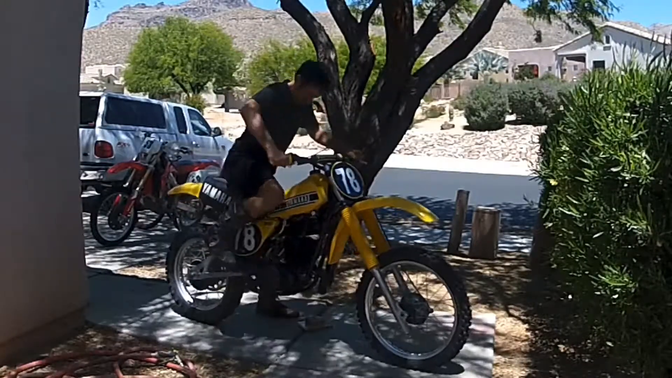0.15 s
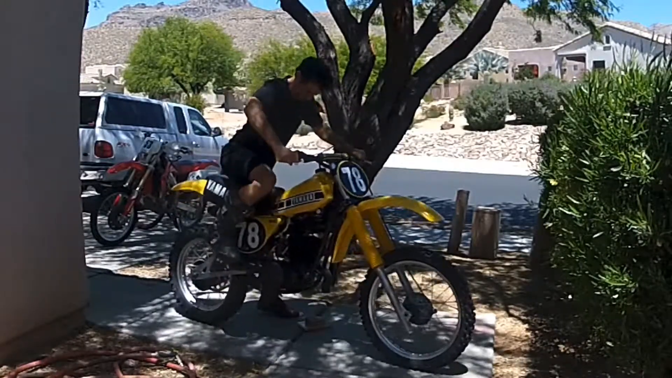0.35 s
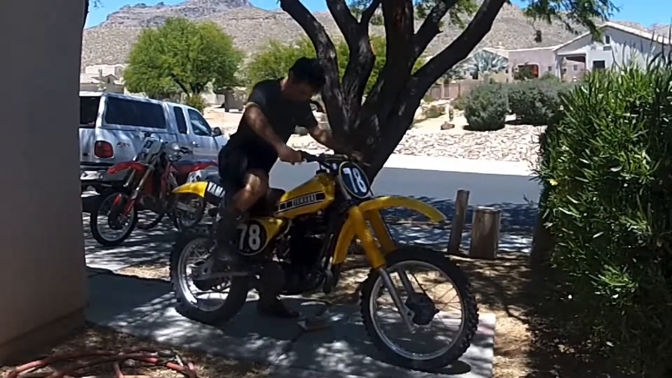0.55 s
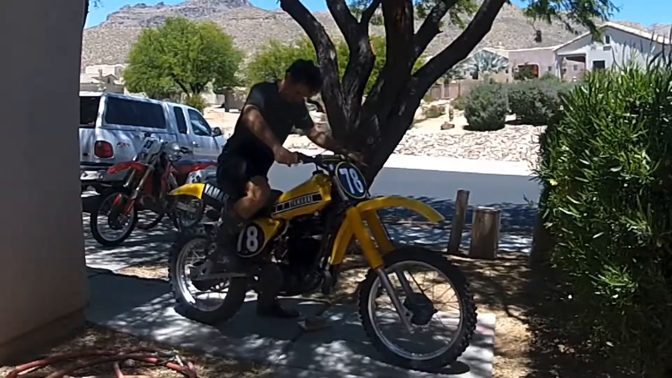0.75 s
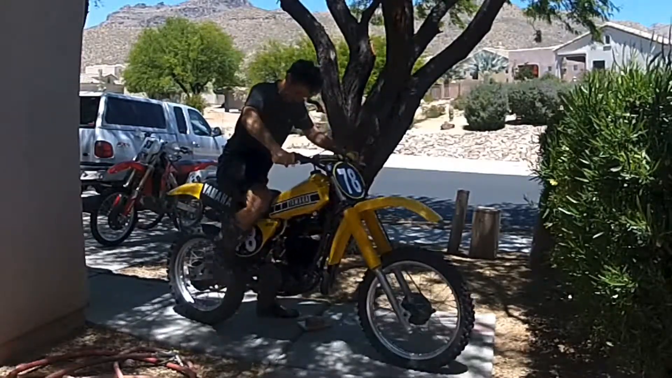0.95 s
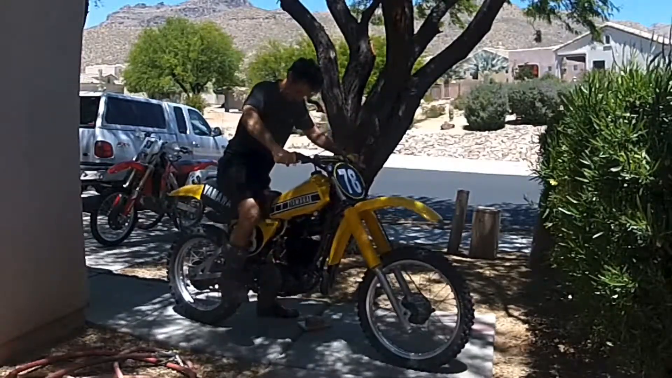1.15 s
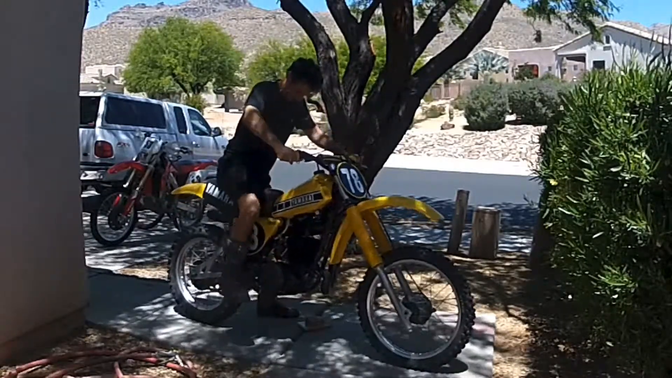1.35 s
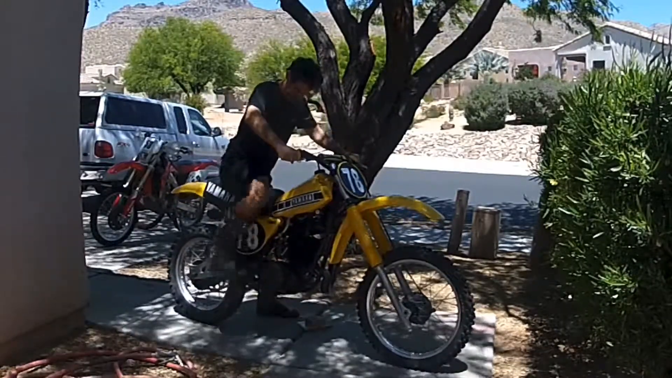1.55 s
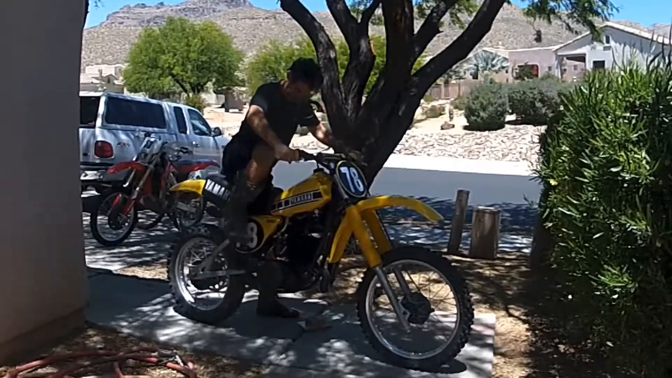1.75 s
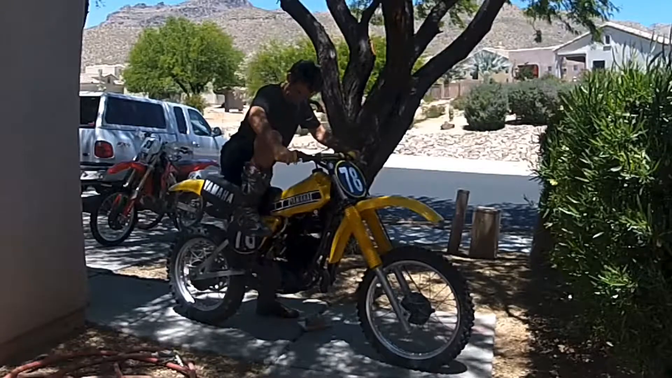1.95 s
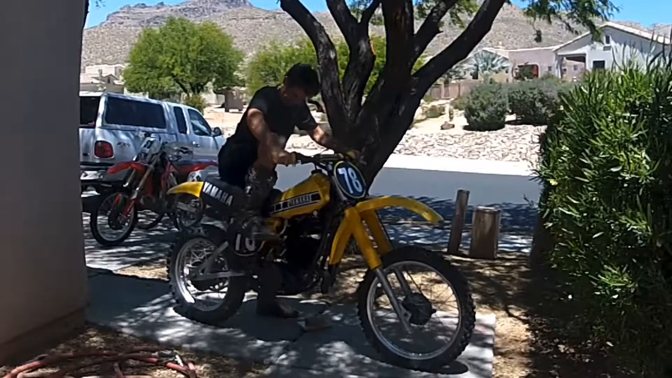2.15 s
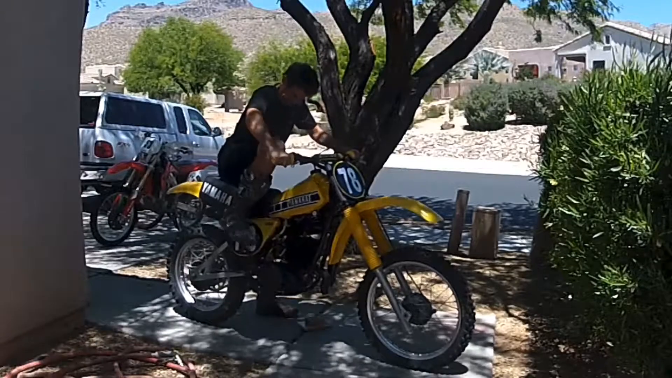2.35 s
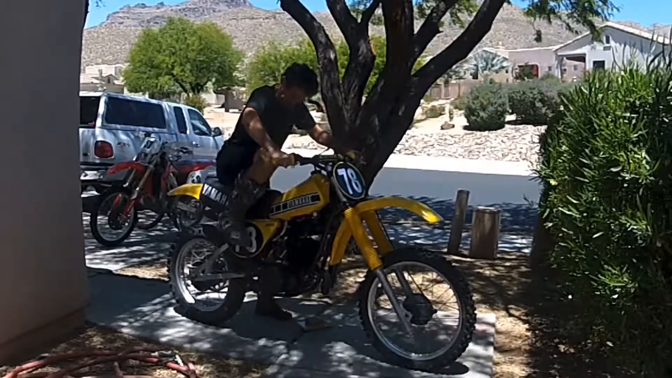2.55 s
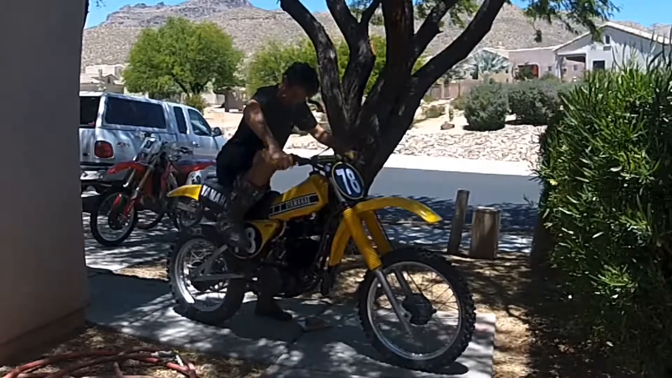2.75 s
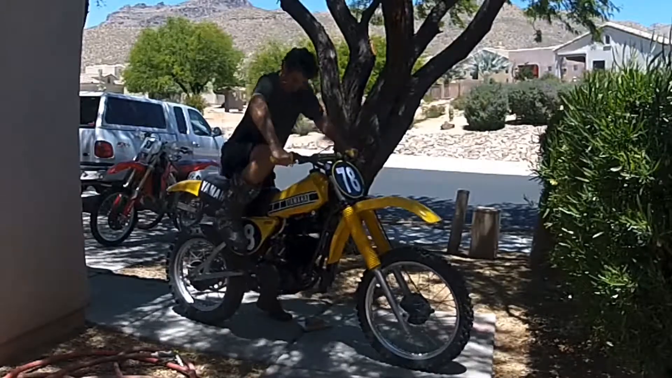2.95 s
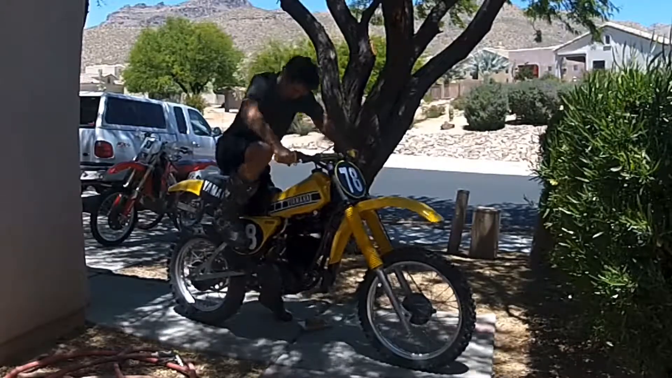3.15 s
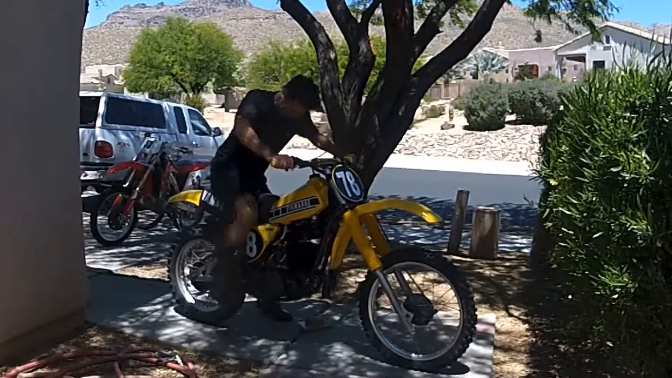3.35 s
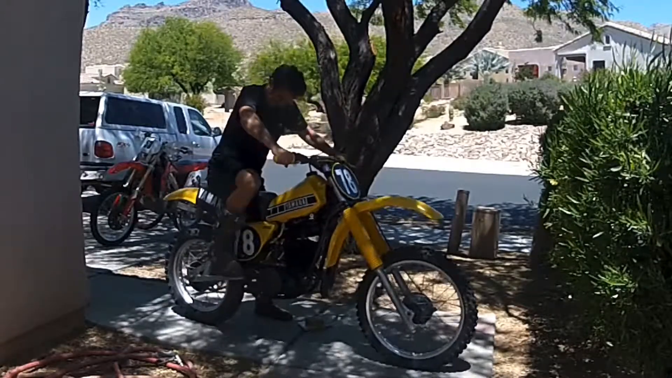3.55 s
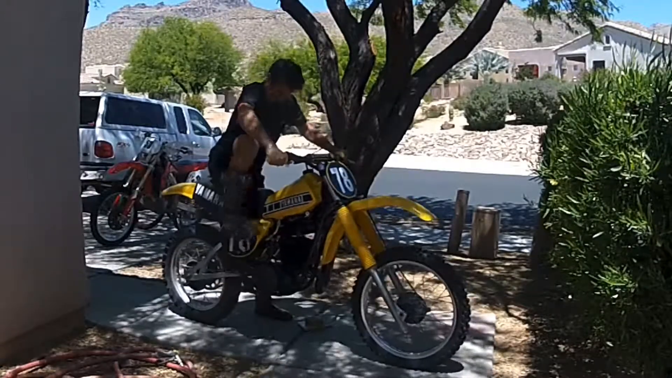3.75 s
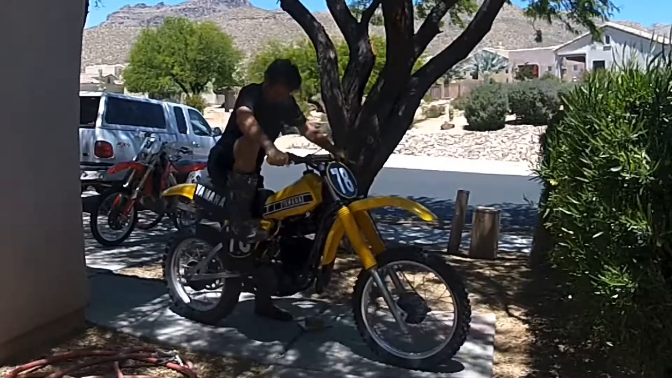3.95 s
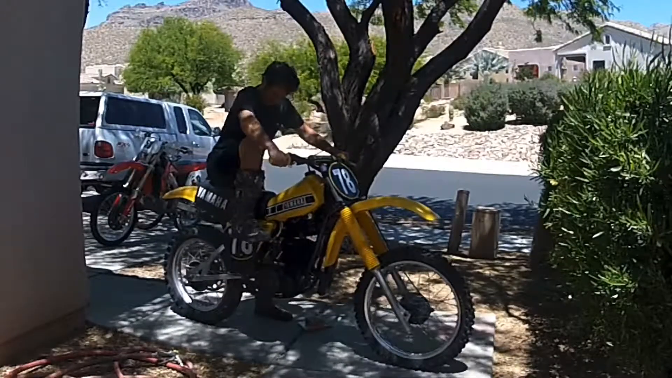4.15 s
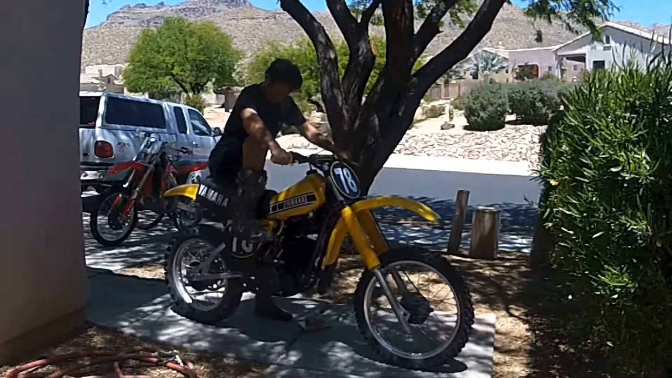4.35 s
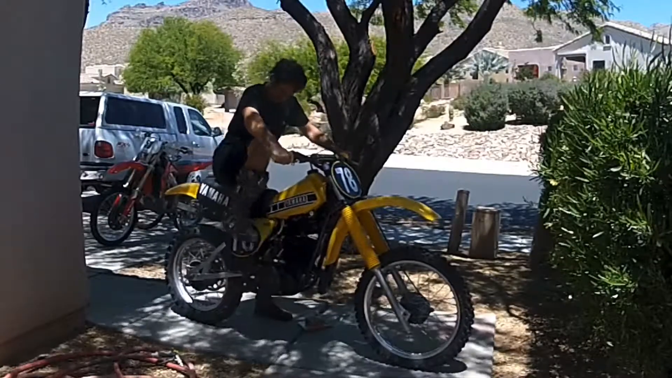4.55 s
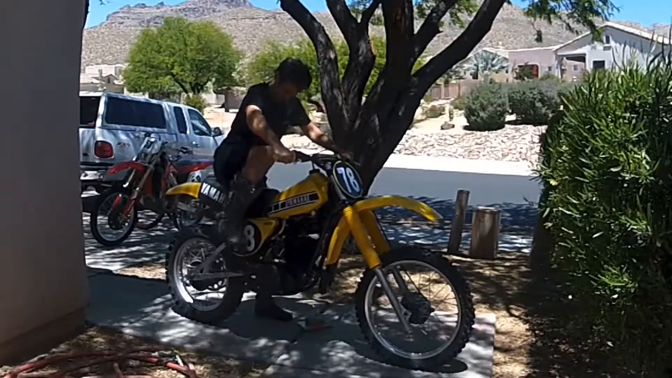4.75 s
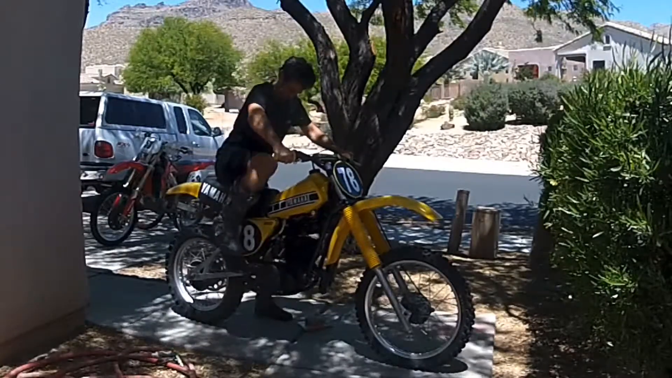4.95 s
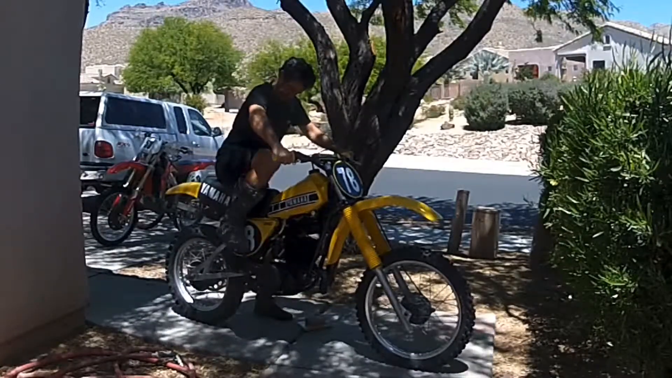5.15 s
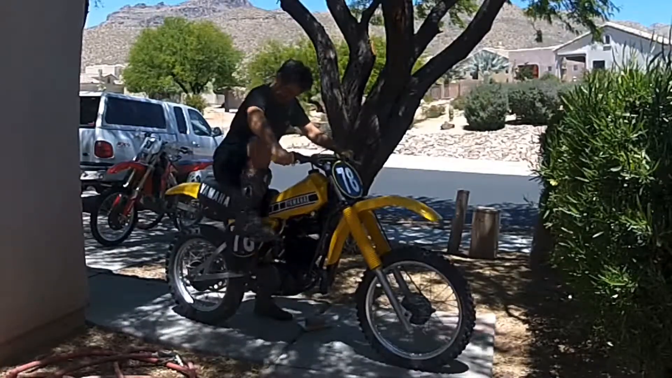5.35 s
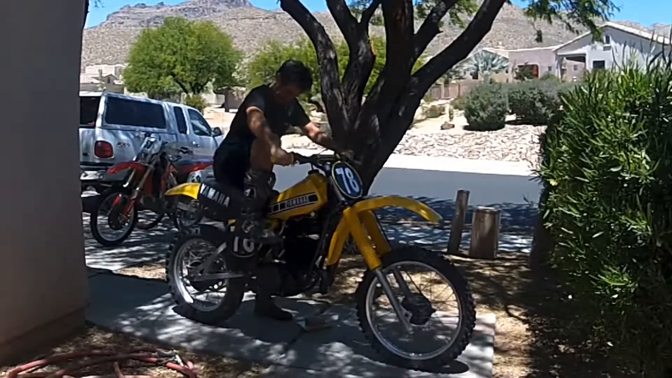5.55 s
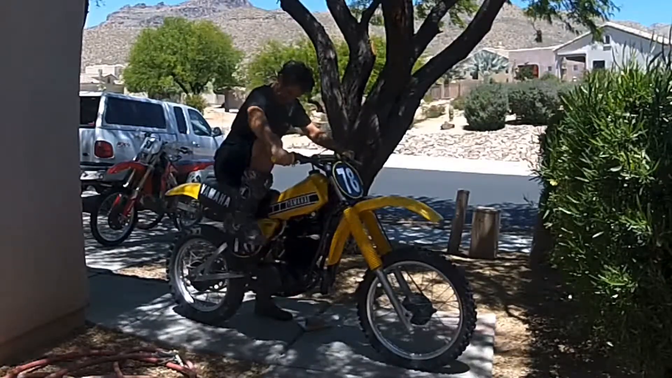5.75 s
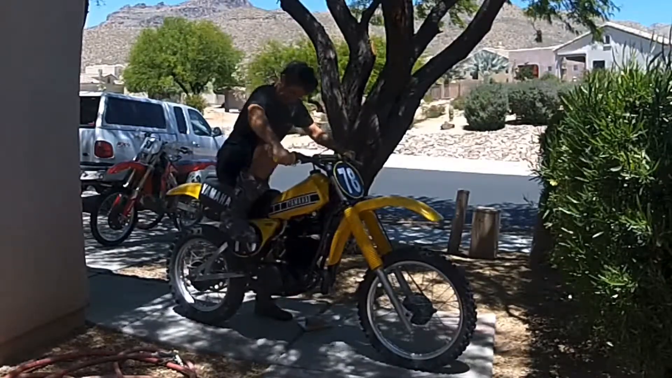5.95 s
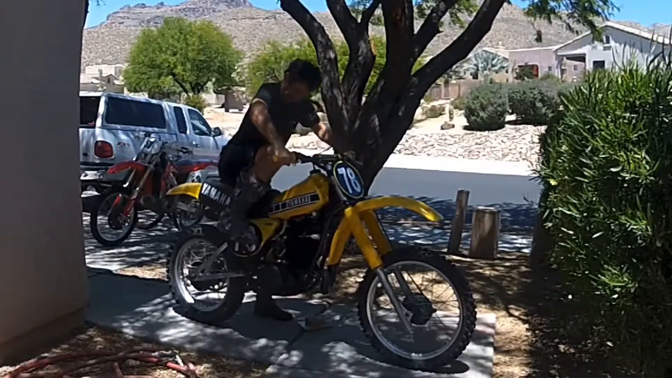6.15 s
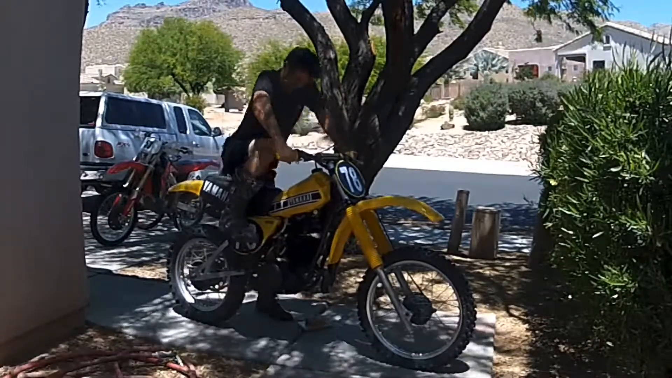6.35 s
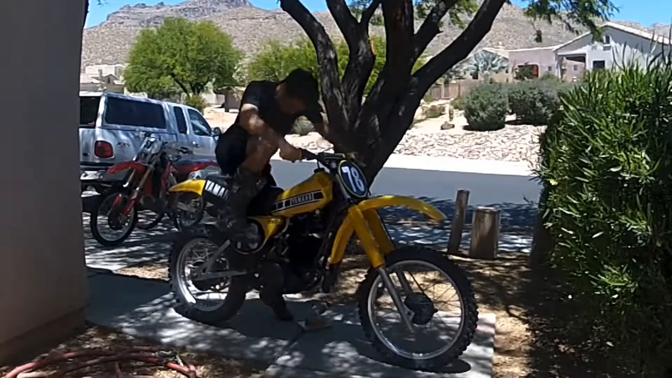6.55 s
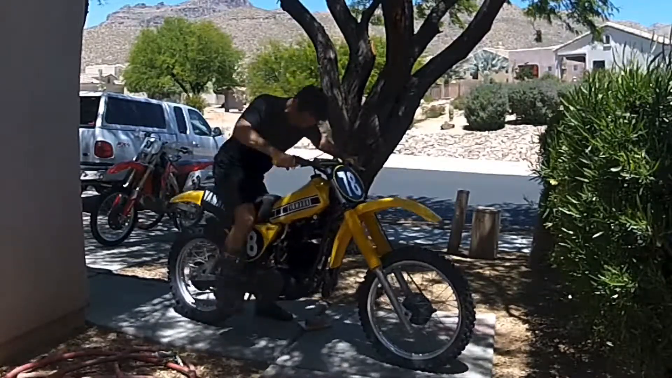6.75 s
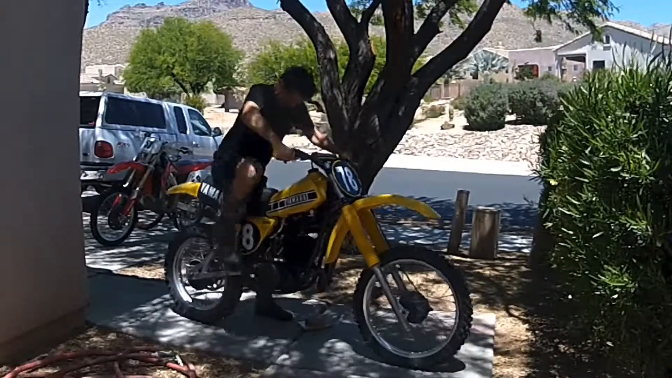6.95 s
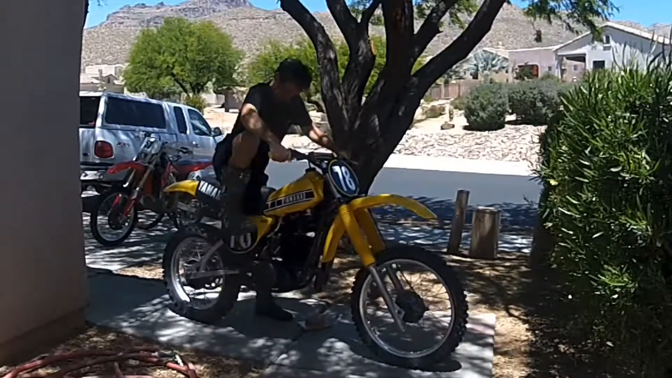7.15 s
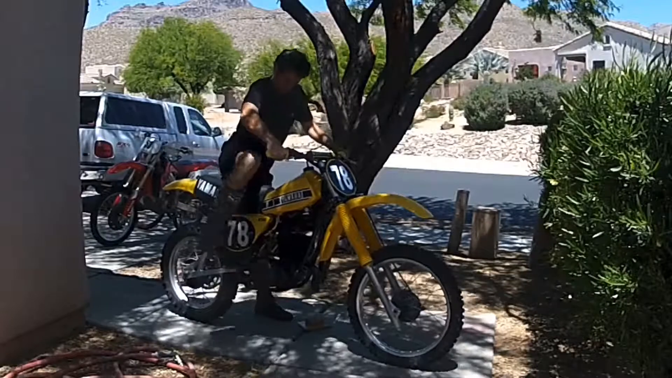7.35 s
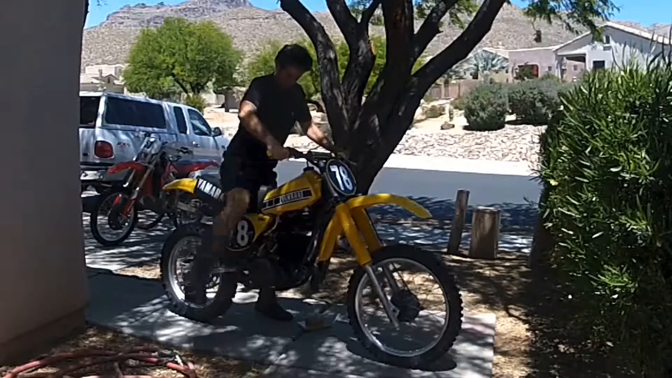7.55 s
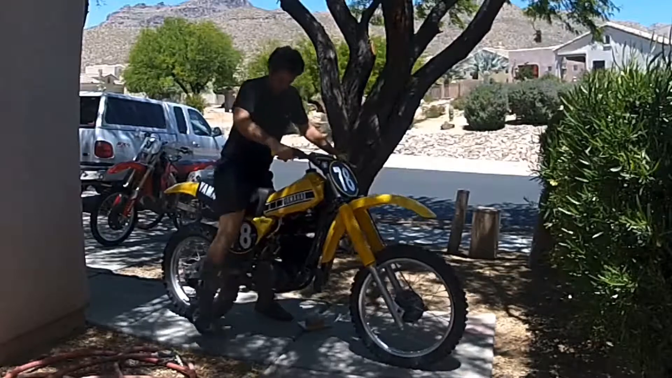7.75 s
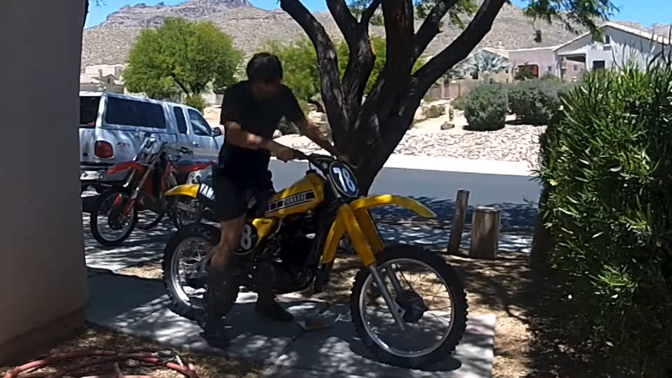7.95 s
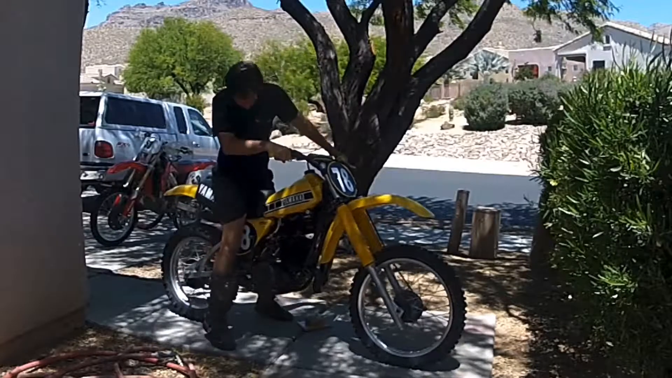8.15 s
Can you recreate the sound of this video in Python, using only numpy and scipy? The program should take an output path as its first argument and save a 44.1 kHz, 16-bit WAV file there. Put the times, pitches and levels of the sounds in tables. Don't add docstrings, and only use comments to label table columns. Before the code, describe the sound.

Soft boot scuffs and one sharp lever clank lead into loose ratchet clicks, then a loud kick turns a two-stroke engine through a few chuffing puffs. After a sparse pause with small clicks, a second, slightly harder kick does the same, ending in pawl ticks. Close, dry microphone with rough treble, short wall echo, far traffic drone and very faint bird whistles.

```python
import sys
import numpy as np
from scipy import signal
from scipy.fft import rfft, irfft
from scipy.io import wavfile
from scipy.ndimage import uniform_filter1d

SR = 44100
rng = np.random.default_rng(int(sys.argv[2]) if len(sys.argv) > 2 else 0)


def undo_db(level):
    steps = np.asarray(level, float) / 20
    return 10 ** steps


def unload_wav(signal):
    wavfile.write(
        sys.argv[1],
        SR,
        np.round(np.clip(np.atleast_2d(signal).T, -1, 1) * 32767).astype(np.int16),
    )


N = 362295

# (frequency [Hz], level [dB per Hz])
CRACK_SPECTRUM = [(500, -46), (900, -8), (1200, -3.5), (1500, -5.5), (1800, -2.5), (2800, 1.5),
                  (3900, -4.5), (4600, -11), (5200, -15.5), (5900, -19), (7500, -65)]
# (frequency [Hz], level
# [dB], t60 [s])
PAWL_MODES = [(1289, -2, .25), (1825, 3, .33), (2670, -3, .2), (2900, 3, .22), (3130, -1, .16)]
# (starter gears at full spin [s], gears [dB], rider drops on the lever [s], fork thump [dB])
KICKS = [
    (3.472, -46.5, 3.27, -51),
    (6.846, -46.5, 6.61, -41),
]


def unit(x):
    return x / np.sqrt(np.mean(x ** 2))


def colour(x, points):
    hz, db = np.transpose(points)
    f = np.arange(len(x) // 2 + 1) * SR / len(x) + 1
    gain = undo_db(np.interp(np.log(f), np.log(hz), db))
    return irfft(rfft(x) * gain, len(x))


def bank(modes, size):
    hz, db, t60 = np.array(modes, float).T[:, :, None]
    t = np.arange(size) / SR
    decay = np.exp(-np.log(1000) * t / t60)
    return undo_db(db) * np.sin(2 * np.pi * hz * t) * decay, hz[:, 0]


def add(out, s, x):
    i = max(int(s * SR), 0)
    out[i:i + len(x)] += x[:len(out) - i]


def walk(rate):
    k = int(SR / rate)
    held = np.repeat(rng.standard_normal(N // k + 1), k)
    return unit(uniform_filter1d(uniform_filter1d(held, k), k)[:N])


def blows(table, ringer, focus_db, crack_db=0.5, crack_s=0.012, frame_db=-17.0):
    # (frequency [Hz], level [dB], t60 [s])
    steel_modes = [(1740, -8, .07), (1825, -6, .1), (1900, -6, .07), (2150, -9, .08), (2430, -8, .08),
                   (2540, -7, .08), (2670, -7, .1), (2820, -6, .1), (2960, -8, .08), (3060, -6, .09),
                   (3150, -6, .09), (3330, -7, .08), (3450, -8, .07), (3690, -7, .07), (3860, -8, .06),
                   (4030, -9, .06), (4250, -13, .05), (4770, -15, .05), (5050, -19, .04)]
    # (frequency [Hz], level [dB], t60 [s])
    hollow_modes = [(405, -1, 0.059), (494, -1, 0.064), (658, 12.5, 0.033), (781, -1.5, 0.085),
                    (1018, -5.5, 0.073)]
    scatter_db, grain_db, rattle_db = 4.0, 3.0, 6.0
    onset = 0.37
    out, size, spurts = np.zeros(N), SR, walk(150)
    steel, hz = bank(steel_modes, size)
    hollow, _ = bank(hollow_modes, size)
    ring, ring_hz = bank(ringer, size)
    t, long = np.arange(4096) / SR, np.arange(size) / SR
    for s, db, thud_db, best_hz, ring_db, ms in table:
        place = rng.standard_normal(32)
        contact = rng.standard_normal((2, 4096))
        hiss = rng.standard_normal(size)
        tau = max(ms, 1) / 2000
        chatter = contact[0] * undo_db(grain_db * contact[1]) * (t / tau) ** onset * np.exp(-t / tau)
        chatter /= np.sqrt(np.sum(chatter ** 2))
        focus = undo_db(-focus_db * np.abs(np.log2(hz / best_hz)))
        body = (undo_db(scatter_db * place[:len(hz)]) * focus) @ steel / 2
        body += undo_db(thud_db) * undo_db(scatter_db * place[-len(hollow_modes):]) @ hollow
        sound = signal.fftconvolve(body, chatter)[:size]
        slope_db = 2.0 * np.log2(best_hz / 2600)
        edge = [(f, d + slope_db * np.log2(f / 2800) - 4.0 * abs(np.log2(f / best_hz)))
                for f, d in CRACK_SPECTRUM]
        loose = rattle_db * spurts[int(s * SR) % (N - size):][:size]
        fade = undo_db(crack_db) * np.exp(-long / (tau + crack_s))
        fade = fade + undo_db(frame_db - 60 * long / 0.14 + loose)
        rise = 1 - np.exp(-long / tau)
        sound = sound * undo_db(0.61 * loose) + unit(colour(hiss, edge)) * rise ** (2 * onset) * fade
        sound *= 1.007 / np.abs(sound).max()
        ring_share = undo_db(ring_db - 11.5 * np.abs(np.log2(ring_hz / best_hz)))
        sound += ring_share @ ring * rise
        add(out, s - .001 - 0.597 * tau, undo_db(db) * sound)
    return out


def lever():
    # (time [s], peak level [dB], strongest frequency [Hz])
    clanks = [(0.0594, -59, 3000), (0.1686, -54, 2890), (0.2094, -55, 2240), (0.9731, -44.5, 2850),
              (0.9982, -35, 2640), (1.0141, -38, 1570), (1.0381, -47, 1630), (1.1615, -17.5, 2900),
              (2.406, -47, 2720), (2.61, -64, 1810), (3.304, -35, 2280), (3.349, -39, 2870),
              (3.398, -39, 2870), (3.433, -14, 3070), (3.5097, -28, 3020), (3.585, -21.5, 2330),
              (3.6111, -30, 2850), (4.556, -53.5, 2900), (4.612, -46, 1810), (5.4031, -36.5, 2850),
              (5.8265, -49.5, 2700), (6.6734, -37, 2370), (6.7126, -39, 1610), (6.73, -40.5, 1860),
              (6.751, -34.5, 1820), (6.802, -11.5, 2900), (6.8495, -25.5, 3200), (6.924, -38, 3060),
              (7.239, -38, 1780)]
    table = []
    for s, db, hz in clanks:
        over_db = db - -36
        thud_db = -2 - 0.69 * max(over_db, 0)
        rattle_ms = 8 - 0.07 * over_db
        table.append((s, db, thud_db, hz, -37.5, rattle_ms))
    return blows(table, PAWL_MODES, focus_db=13.0)


def ratchet():
    # (time [s], peak level [dB], strongest frequency [Hz], rattle
    # [ms])
    ticks = [(1.511, -36, 2940, 11.8), (1.6086, -35, 3270, 5.5), (1.7257, -34.5, 2800, 6.8),
             (1.8611, -39.5, 2670, 9.9), (1.958, -51, 1790, 4.1), (2.2603, -52.5, 2880, 8.9),
             (2.414, -48.5, 1150, 12), (2.53, -54.5, 2600, 45), (3.7055, -33, 2850, 5.3),
             (3.792, -34.5, 2000, 4.8), (3.839, -37, 2040, 9.3), (4.296, -52.5, 1810, 5),
             (5.3262, -34.5, 2960, 8.8), (5.7485, -53.5, 2940, 8), (5.836, -50.5, 1260, 12),
             (7.0218, -30.5, 3120, 3.98), (7.0812, -36.5, 2030, 3.83), (7.1663, -32, 1920, 6.5),
             (7.219, -37, 1800, 4.2)]
    thud_db, ring_db = -20, -16
    table = [(s, db, thud_db, hz, ring_db, ms) for s, db, hz, ms in ticks]
    return blows(table, PAWL_MODES, focus_db=38.0, crack_db=-7.0, crack_s=.004, frame_db=-16.0)


def spring():
    # (frequency [Hz], level [dB], t60 [s])
    spring_mode = [(1289, -8, 2.8)]
    # (time [s], level [dB], damped by boot or ratchet at [s])
    plucks = [
        (1.162, -58, 1.5),
        (3.433, -57, 3.66),
        (5.326, -64, 5.75),
        (6.802, -51, 7.16),
    ]
    out, t = np.zeros(N), np.arange(SR) / SR
    tone = bank(spring_mode, SR)[0][0]
    for s, db, stop_s in plucks:
        damping = np.exp(-np.maximum(t + s - stop_s, 0) / 0.11)
        add(out, s, undo_db(db) * tone * damping)
    return out * undo_db(1.5 * walk(31))


def chamber(table, scatter_db=4.5, focus_db=11.0):
    # (frequency [Hz], level [dB], t60 [s])
    chamber_modes = [(86.6, -9.5, 0.07), (143, -24, .05), (189.8, -8, .13), (245, -5, 0.086),
                     (314, 1.5, 0.057), (382.5, -2.5, 0.091), (443, -3, 0.077), (549.6, -2, 0.052),
                     (664, -5, 0.053), (814, -57, 0.087)]
    out, t = np.zeros(N), np.arange(8192) / SR
    modes, hz = bank(chamber_modes, size=SR // 2)
    mouth = signal.butter(2, (70, 850), "band", fs=SR, output="sos")
    pop = t * np.exp(-t / 0.00075)
    for s, db, best_hz, ms, gas_db in table:
        place, gas = rng.standard_normal(len(hz)), rng.standard_normal(8192)
        flow = gas * np.exp(-t * 1000 / max(ms, 2))
        push = pop / pop.sum() + undo_db(gas_db) * flow / np.sqrt(np.sum(flow ** 2))
        share = undo_db(scatter_db * place - focus_db * np.abs(np.log2(hz / best_hz)))
        wave = signal.sosfilt(mouth, signal.fftconvolve(share @ modes, push))
        add(out, s - .003, undo_db(db - 4.0) * wave / np.abs(wave).max())
    return out


def engine():
    # (time [s], peak level [dB], strongest frequency of the wave back from the chamber's cone [Hz])
    turns = [
        (3.354, -18.5, 180),
        (3.462, -11, 380),
        (3.557, -23.5, 200),
        (3.652, -31.5, 210),
        (6.723, -15, 185),
        (6.821, -13.5, 330),
        (6.907, -16, 260),
        (6.985, -36, 205),
    ]
    # (delay [ms], level [dB], own strongest frequency [Hz], pull to returning pitch [0-1])
    gusts = [
        (0, -3, 50, 0.43),
        (9.95, 0.9, 158, 0.5),
        (34.04, -3, 300, .99),
        (57.02, -7, 148, 0),
    ]
    blow_down_ms, gas_db = 16.7, -4
    table = []
    for s, db, back_hz in turns:
        for ms, gust_db, hz, pull in gusts:
            pulled_hz = hz * (back_hz / hz) ** np.clip(pull, 0, 1)
            table.append((s + ms / 1000, db + gust_db, pulled_hz, blow_down_ms, gas_db))
    return chamber(table, scatter_db=2.0, focus_db=12.0)


def boot():
    # (time [s], peak level [dB], strongest
    # frequency [Hz], scrape level [dB])
    scuffs = [(0.018, -47, 194, 10), (0.729, -52, 167, 7), (1.006, -38, 673, 9), (1.046, -29.5, 155, -15),
              (1.062, -36, 175, 9), (1.09, -37, 151, 2), (1.16, -27.5, 680, 4), (1.198, -43, 223, 5),
              (2.407, -41.5, 167, -5), (3.435, -16.5, 400, -6.5), (3.584, -14.5, 660, -9.5),
              (4.618, -41, 194, -4), (5.399, -55, 213, -7), (5.826, -48, 151, 0), (6.652, -40, 235, 12),
              (6.681, -26.5, 231, -6), (6.75, -25.5, 680, 6.5), (6.804, -13, 686, -5.5),
              (7.223, -41, 151, -8), (7.235, -39, 705, 9)]
    scrape_ms = 20.6
    return chamber([(s, db, hz, scrape_ms, scrape_db) for s, db, hz, scrape_db in scuffs])


def gears():
    rise_db_s, coast_db_s, coast_s = 179, 117, 0.15
    meshing = rng.standard_normal(N) * undo_db(5.0 * rng.standard_normal(N) + 4.0 * walk(60))
    t, gain = np.arange(N) / SR, np.zeros(N)
    for s, db, _, _ in KICKS:
        drop_db = np.maximum(rise_db_s * (s - t), coast_db_s * (t - s))
        gain += undo_db(db - drop_db) * (t < s + coast_s)
    spectrum = [(f, d + 4.0 * abs(np.log2(f / 2800))) for f, d in CRACK_SPECTRUM]
    return gain * unit(colour(meshing, spectrum))


def thump():
    t = np.arange(N) / SR
    sway = np.sin(2 * np.pi * 50.5 * t)
    return sum(undo_db(db - 10 * ((t - s) / 0.084) ** 2) * sway for _, _, s, db in KICKS)


def birds():
    # (time [s], length [s], start [Hz], end [Hz], level [dB])
    whistles = [(1.038, .035, 4050, 4150, -63), (1.04, .03, 5100, 5150, -66),
                (2.975, .015, 5600, 5750, -66), (2.99, .008, 4300, 3500, -66),
                (3.003, .012, 4600, 4700, -67), (3.027, .022, 3950, 4050, -66),
                (3.044, .012, 4500, 4700, -66), (3.052, .008, 4000, 3400, -68),
                (3.063, .01, 5300, 5350, -69), (3.082, .022, 3500, 3400, -68),
                (3.09, .025, 4150, 4050, -72), (6.0, .05, 4600, 4400, -72), (6.23, .04, 2950, 2850, -72),
                (6.288, .016, 4100, 3950, -68), (6.525, .025, 4500, 4300, -71),
                (6.535, .11, 4080, 3960, -67)]
    out = np.zeros(N)
    for s, length, from_hz, to_hz, db in whistles:
        n = int(length * SR)
        hz = np.linspace(from_hz, to_hz, n) * (1 + 0.025 * walk(173)[:n])
        level = undo_db(db + 3.0 * walk(560)[:n]) * np.hanning(n) ** .5
        add(out, s, level * np.sin(2 * np.pi * np.cumsum(hz) / SR))
    leaves = rng.standard_normal(8192) * np.exp(-np.arange(8192) / SR / 0.024)
    leaves /= np.sqrt(np.sum(leaves ** 2))
    return out + undo_db(-1.0) * signal.fftconvolve(out, leaves)[:N]


def yard(x):
    t60_s, wall_s = 0.32, 0.014
    t = np.arange(SR) / SR
    tail = rng.standard_normal(SR) * (1 - np.exp(-t / 0.016)) * np.exp(-np.log(1000) * t / t60_s)
    tail = signal.sosfilt(signal.butter(1, 3300, fs=SR, output="sos"), tail)
    tail *= undo_db(-12) / np.sqrt(np.sum(tail ** 2))
    tail[0] += 1
    tail[int(wall_s * SR)] += undo_db(-18.5)
    return signal.fftconvolve(x, tail)[:N]


def town():
    # (frequency [Hz], level [dB per Hz])
    town_spectrum = [(11, -31.5), (18, 7.5), (59, -5), (81, 3), (135, -2.5), (176, -0.5), (204, 0.5),
                     (260, -5), (412, -13.5), (686, -20.5), (813, -24.5), (896, -27), (1390, -30),
                     (4670, -35.5), (5950, -42.5), (7740, -87), (13100, -120)]
    # (time [s], loudness [dB])
    traffic = [(0, 0.5), (1.2, -1.5), (2.1, 3), (3.0, -1), (3.9, 3), (4.4, -2), (5.4, 1), (6.3, -3.5),
               (7.1, 2), (7.6, -5), (8.2, -1.5)]
    flicker_db = 1.2
    air = unit(colour(rng.standard_normal(N), town_spectrum))
    deep = signal.sosfiltfilt(signal.butter(2, 125, fs=SR, output="sos"), air)
    low = signal.sosfiltfilt(signal.butter(2, 450, fs=SR, output="sos"), air)
    busy_db = np.interp(np.arange(N) / SR, *np.transpose(traffic))
    drone_db = busy_db + flicker_db * walk(6)
    deep_db = -.3 * busy_db + 0.76 * walk(2.4) + flicker_db * walk(6)
    return undo_db(-49.5) * (air - low + undo_db(drone_db) * (low - deep) + undo_db(deep_db) * deep)


def scene():
    bike = lever() + ratchet() + spring() + engine() + boot() + gears() + thump()
    return (yard(bike + birds()) + town())[None]


def roll_off(x):
    return signal.sosfilt(signal.butter(12, 16310, fs=SR, output="sos"), x)


def record(dry):
    mic = signal.sosfilt(signal.butter(2, 41, "high", fs=SR, output="sos"), dry)
    slow = signal.resample_poly(mic, 40, 147, axis=1)
    held = np.repeat(slow, 4, axis=1)
    held = signal.resample_poly(held, 147, 160, axis=1)[:, :N]
    cut = signal.sosfilt(signal.ellip(10, .2, 50, 15300, fs=SR, output="sos"), held)
    return roll_off(cut)


dry = scene()
out = record(dry)
unload_wav(out)
```